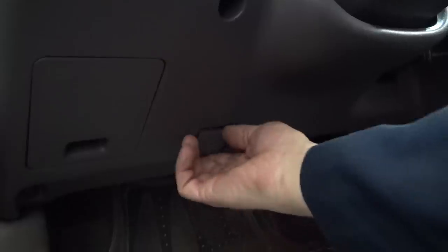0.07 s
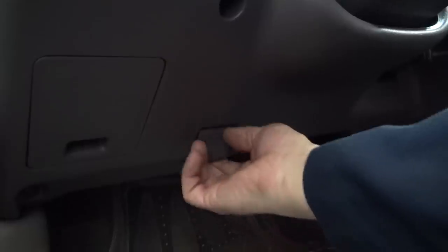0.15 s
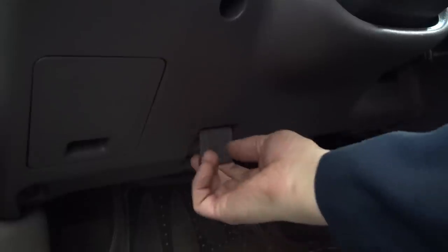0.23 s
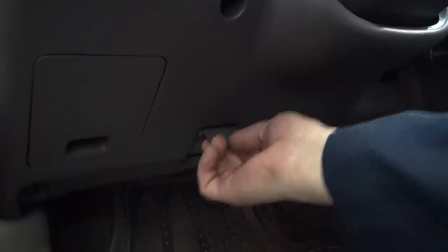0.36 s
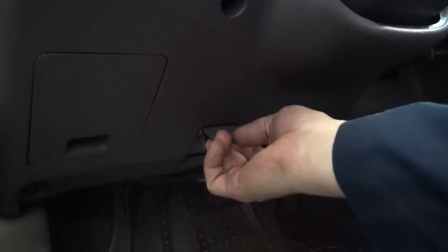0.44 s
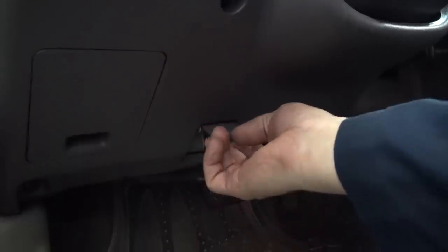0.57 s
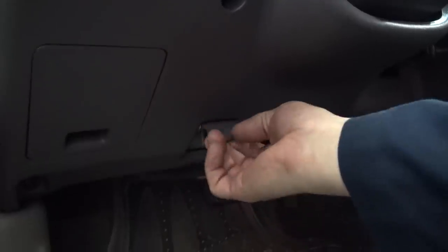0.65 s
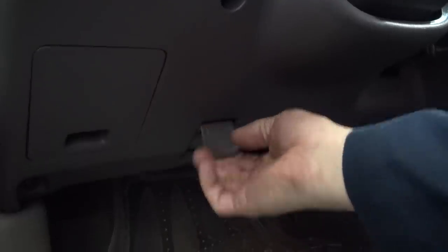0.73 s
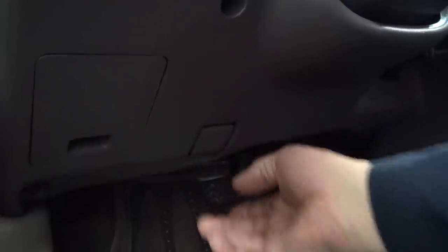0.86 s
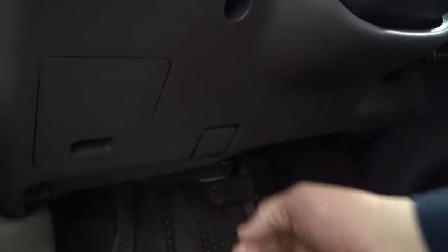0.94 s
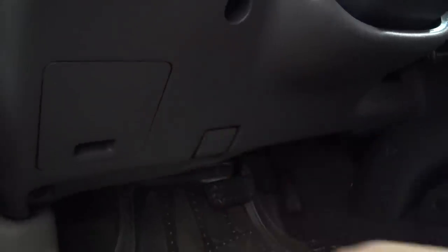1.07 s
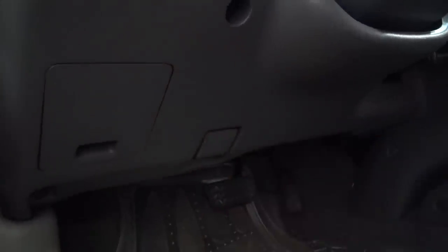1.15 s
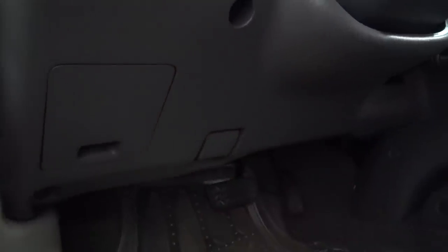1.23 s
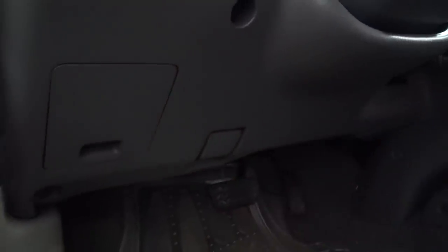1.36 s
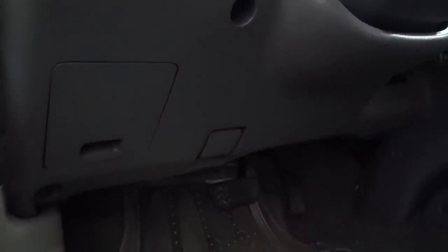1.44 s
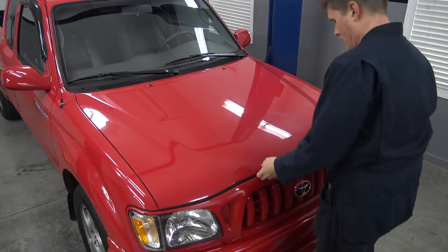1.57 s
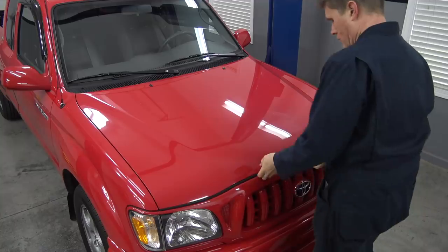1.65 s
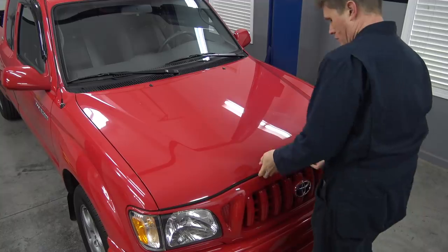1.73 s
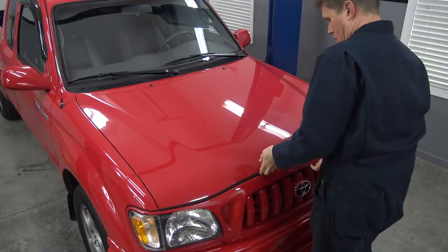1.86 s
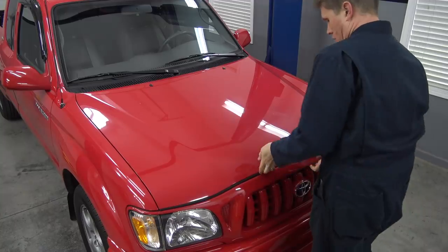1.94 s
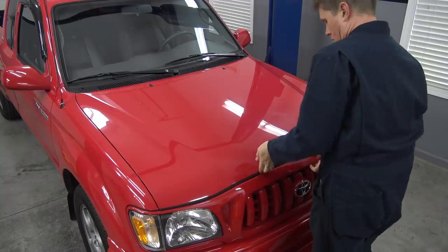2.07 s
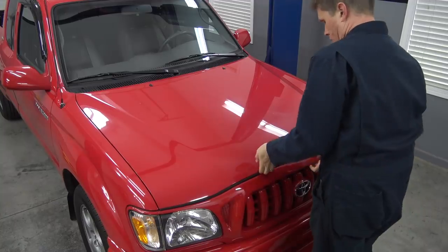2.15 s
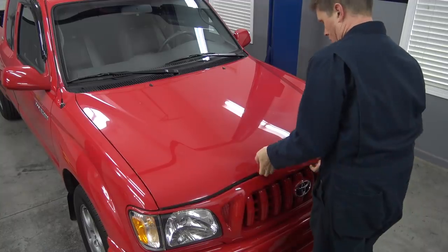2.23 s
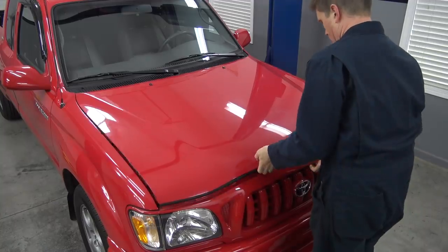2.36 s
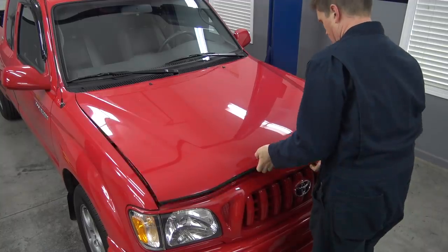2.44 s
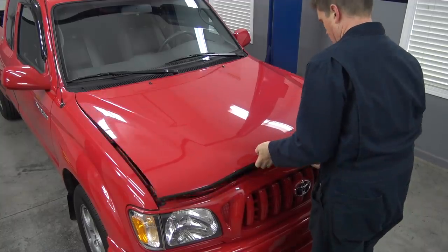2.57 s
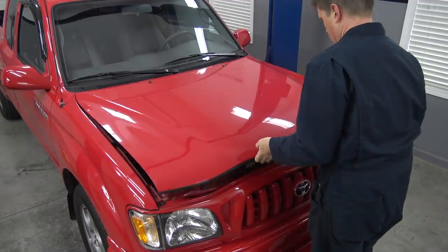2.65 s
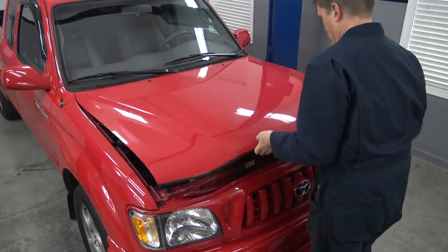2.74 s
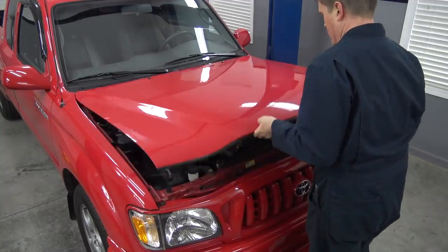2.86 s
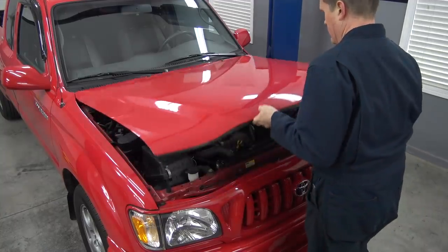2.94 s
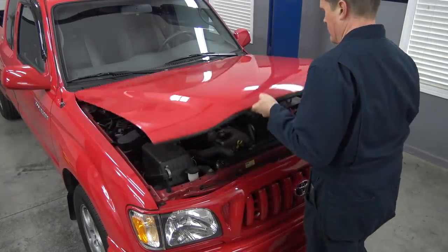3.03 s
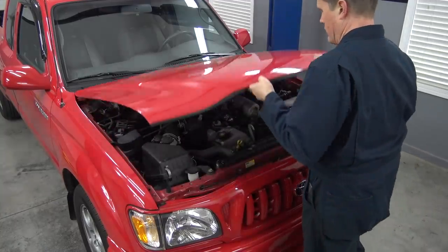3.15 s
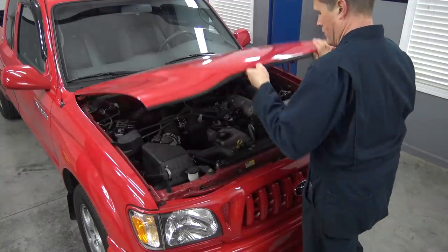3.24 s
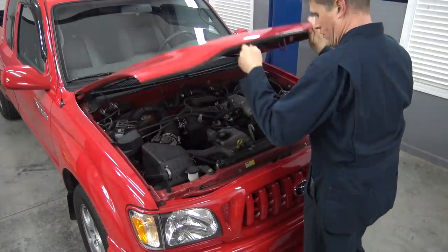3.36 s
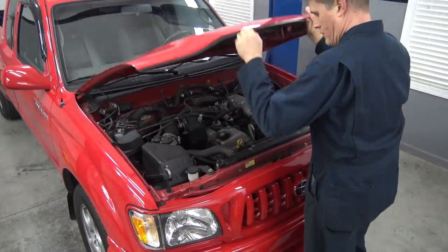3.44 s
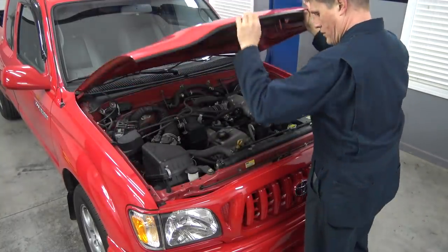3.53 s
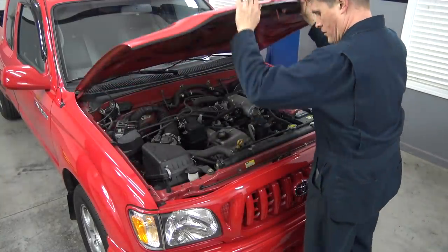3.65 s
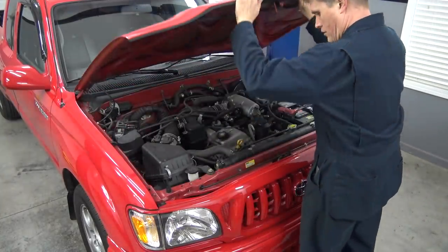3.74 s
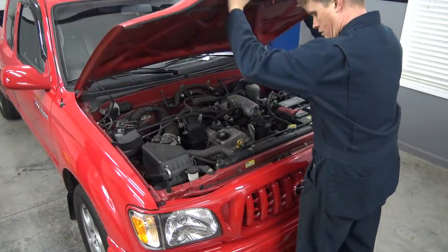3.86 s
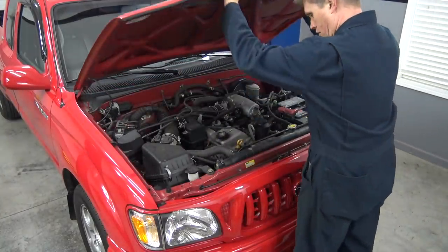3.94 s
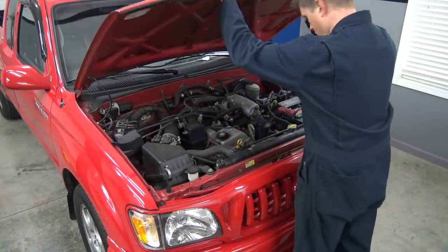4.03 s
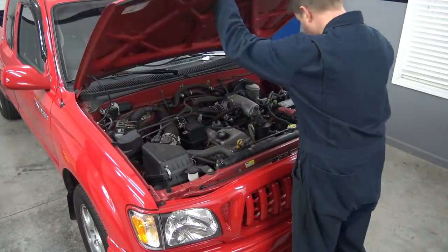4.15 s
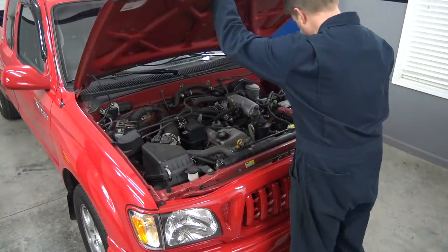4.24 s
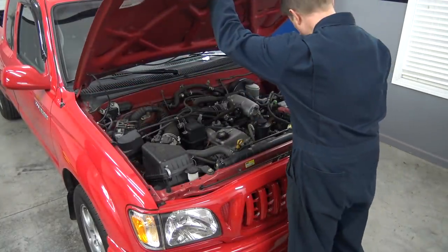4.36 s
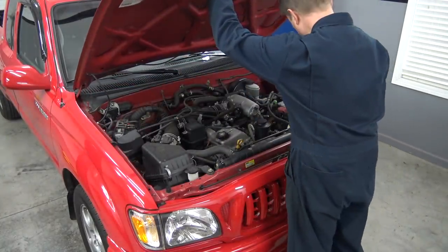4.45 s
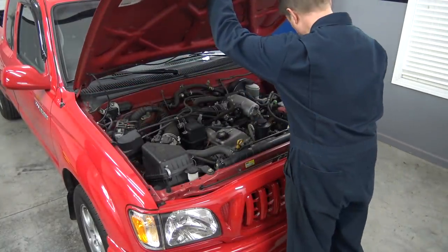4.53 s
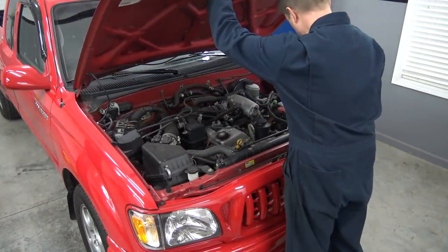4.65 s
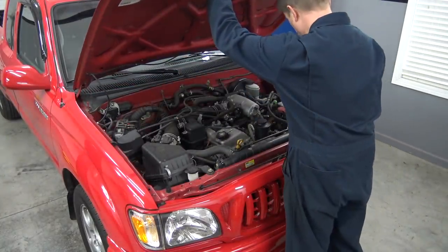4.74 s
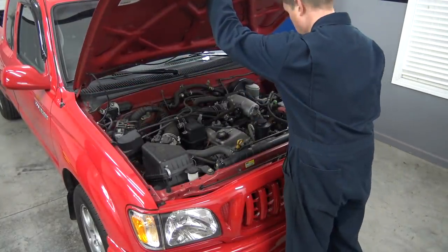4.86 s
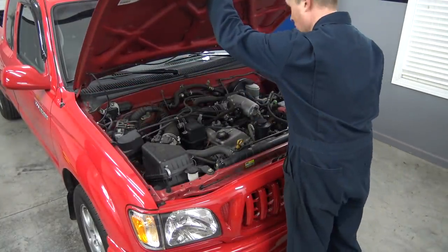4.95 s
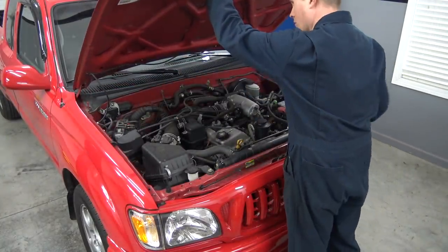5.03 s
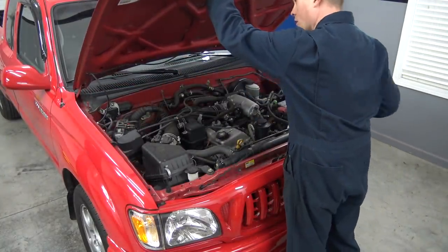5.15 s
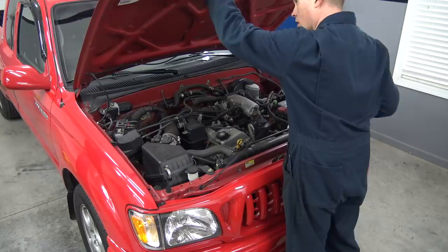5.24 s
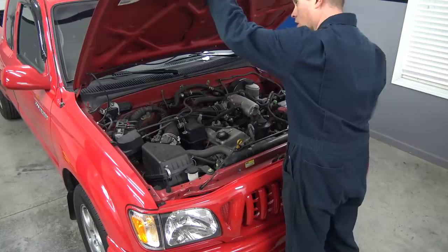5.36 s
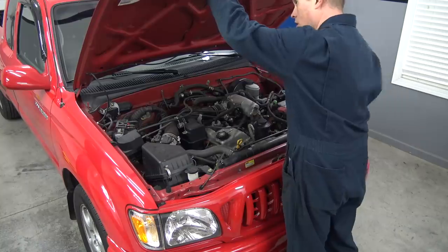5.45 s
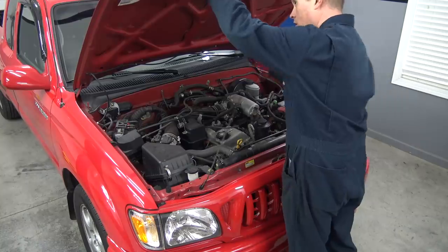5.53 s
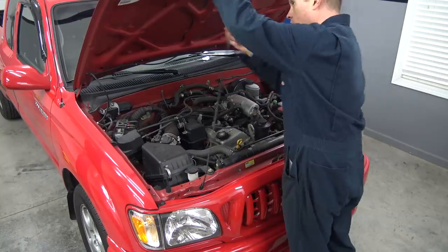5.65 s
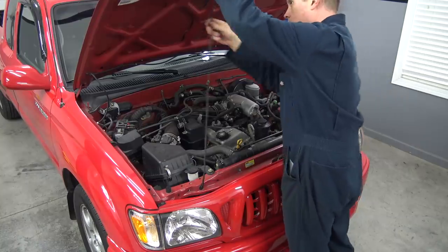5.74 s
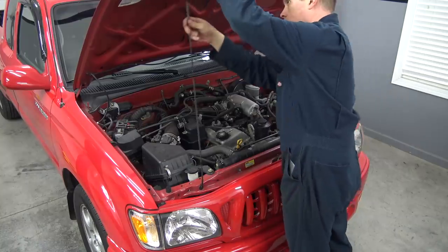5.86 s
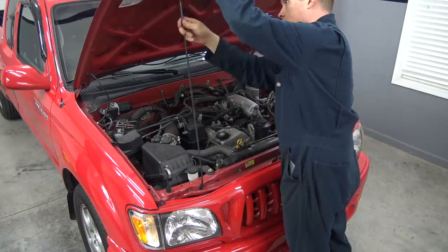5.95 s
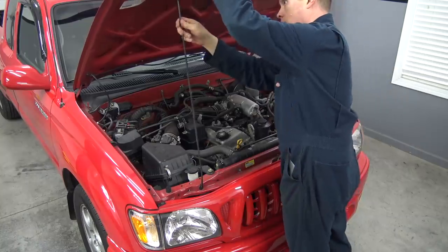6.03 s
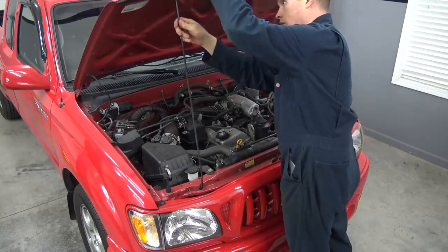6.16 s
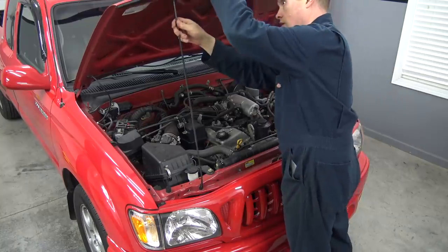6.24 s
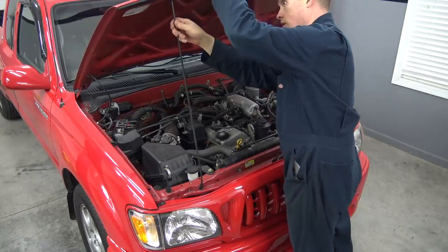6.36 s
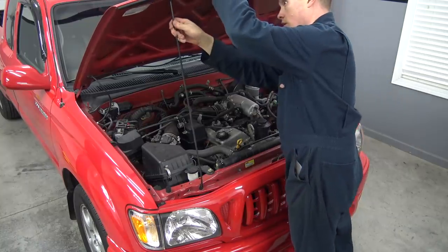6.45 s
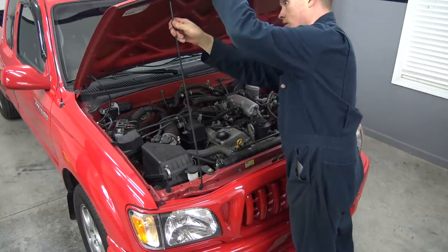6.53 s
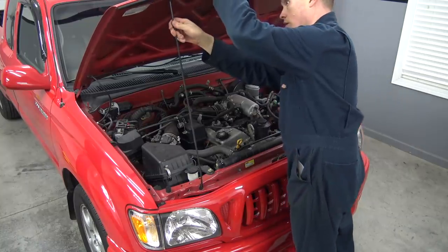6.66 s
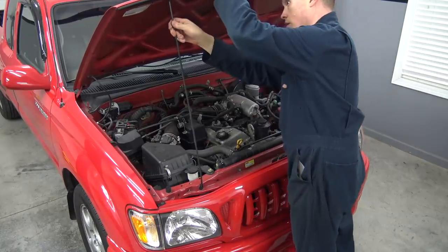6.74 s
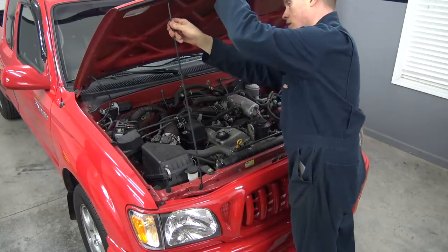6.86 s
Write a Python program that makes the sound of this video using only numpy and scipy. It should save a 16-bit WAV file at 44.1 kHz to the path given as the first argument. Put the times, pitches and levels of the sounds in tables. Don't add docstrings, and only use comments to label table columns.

```python
import sys
import numpy as np
from scipy import signal
from scipy.fft import rfft, irfft, next_fast_len
from scipy.io import wavfile

SR = 44100
rng = np.random.default_rng(int(sys.argv[2]) if len(sys.argv) > 2 else 0)


def voltage_ratio(decibels):
    exponent = np.asarray(decibels, float) / 20
    return 10 ** exponent


def pcm_store(signal):
    levels = np.round(np.clip(np.atleast_2d(signal), -1, 1) * 32767)
    wavfile.write(sys.argv[1], SR, levels.astype(np.int16).T)


N = 304016


def band(x, low_hz, high_hz):
    return signal.sosfilt(signal.butter(2, [low_hz, min(high_hz, .45 * SR)], "band", fs=SR, output="sos"), x)


def rms_one(x):
    return x / np.sqrt(np.mean(x ** 2) + 1e-20)


def at_hz(points, hz):
    table_hz, value = np.array(points).T
    return np.interp(np.log(hz), np.log(table_hz), value)


def drift(rate):
    r = np.exp(-80 * np.pi * rate / SR)
    white = rng.standard_normal(N // 40 + 2002)
    slow = rms_one(signal.lfilter([1], [1, -2 * r, r * r], white)[2000:])
    return np.interp(np.arange(N) / 40, np.arange(len(slow)), slow)


def coloured(spectrum):
    size = next_fast_len(N)
    hz = np.maximum(np.fft.rfftfreq(size, 1 / SR), 1)
    white = rfft(rng.standard_normal(N), size)
    return rms_one(irfft(white * voltage_ratio(at_hz(spectrum, hz)), size)[:N])


def causal(level_db):
    cepstrum = irfft(level_db * np.log(10) / 20)
    half = len(cepstrum) // 2
    cepstrum[1:half] *= 2
    cepstrum[half + 1:] = 0
    return irfft(np.exp(rfft(cepstrum)))[:half]


def spread(side, top_hz):
    low = signal.sosfilt(signal.butter(2, top_hz, fs=SR, output="sos"), side)
    return low * np.array([[1], [-1]])


BAND_EDGES_HZ = (60, 350, 1500, 5000, 15500)
BAND_CENTRES_HZ = (30, 150, 720, 2700, 8500, 16500)
# (contact length [s], thump over body [dB], thump per weight [dB/dB],
# body per weight [dB/dB])
TOUCH = dict(lever=(.006, -3, 1.3, .7), pop=(.013, .6, 1.1, .9), tick=(.0092, -2, 1.2, .8),
         latch=(.007, -1.5, 1.1, 1.05), palm=(.024, 1.5, 1.4, .7), hinge=(.009, -1, 1.1, .9),
         creak=(.027, -6, 2.2, .7), clip=(.0036, -3, 1.1, .9), slot=(.012, -6, 1.3, .75),
         sleeve=(.027, -4, 1.1, 1.1))


def contacts(events, touch, peaks, rise, low_stretch, end_db):
    out = np.zeros((2, N + SR))
    t = np.arange(SR // 5) / SR
    hz = np.linspace(1, SR / 2, 4097)
    body = sum(level_db / (1 + (2 * (hz - top_hz) / width_hz) ** 2) for top_hz, width_hz, level_db in peaks)
    spread_db = 10 * np.log10(SR / 2 / np.diff(BAND_EDGES_HZ))
    split = [signal.butter(1, 500, kind, fs=SR) for kind in ("high", "low")]
    length, lean_db, thump_share, body_share = TOUCH[touch]
    taus = length * np.array([[1], [low_stretch]])
    shapes = (1 - np.exp(-t / (rise * taus))) * np.exp(-t / taus)
    shapes = shapes / shapes.max(axis=1, keepdims=True)
    for s, clack_db, weight_db, tick_db in events:
        thump_db = thump_share * weight_db + lean_db
        body_db = body_share * weight_db - lean_db
        levels = np.array([thump_db, body_db, 0, tick_db]) + spread_db + clack_db - 6.5
        levels = [levels[0] + end_db[0], *levels, levels[-1] + end_db[1]]
        colour = causal(at_hz(list(zip(BAND_CENTRES_HZ, levels)), hz) + body)
        noise = rng.standard_normal(shapes.shape) * shapes
        grain = sum(signal.lfilter(*f, n) for f, n in zip(split, noise))
        burst = signal.fftconvolve(grain, colour)
        at = round(s * SR)
        out[0, at:at + len(burst)] += burst
        out[1, at:at + len(colour)] += colour * np.sqrt(np.sum(noise[0] ** 2))
    return out[:, :N]


def ringing(x, modes, ring_db):
    out = np.zeros(N)
    for hz, level_db, t60 in modes:
        r = voltage_ratio(-60 / (t60 * SR))
        w = 2 * np.pi * hz / SR
        ring = signal.lfilter([0, np.sin(w)], [1, -2 * r * np.cos(w), r * r], x + 1e-18)
        out += voltage_ratio(level_db + ring_db) * ring
    return out


def panel_hums(notes, swell_s, t60):
    out, t = np.zeros(N + SR), np.arange(SR // 3) / SR
    for s, level_db, hz in notes:
        swell = (1 - np.exp(-t / swell_s)) * voltage_ratio(level_db - 60 * t / t60)
        out[round(s * SR):][:len(t)] += swell * np.sin(2 * np.pi * hz * t + rng.uniform(0, 2 * np.pi))
    return out[:N]


def room(x, t60_table, build_s, side_db):
    t = np.arange(2 * SR) / SR
    edges = 25 * 2 ** np.arange(0, 9.5, .3)
    white, tail = rng.standard_normal((2, 2, len(t))), 0
    for k, (low_hz, high_hz) in enumerate(zip(edges, edges[1:])):
        t60 = at_hz(t60_table, np.sqrt(low_hz * high_hz))
        tail = tail + band(white[k % 2], low_hz, high_hz) * voltage_ratio(-60 * t / t60)
    tail = tail * (1 - np.exp(-t / build_s)) / np.sqrt(SR / 10)
    mid, side = signal.fftconvolve(x[None], tail, axes=1)[:, :N]
    return mid + voltage_ratio(side_db) * spread(side, 1260)


# (frequency [Hz], level [dB per Hz])
ROOM_TONE = [(15, -32), (25, -14), (53, -12), (127, 1.5), (170, -11), (285, 1.5), (335, -8), (560, -10.5),
             (624, -7.5), (2690, -16), (3620, -17), (4250, -17.5), (4610, -16.5), (6050, -20.5),
             (16000, -31)]
# (frequency [Hz], level [dB per Hz])
CLOTH = [(500, 16), (1500, 7), (3000, -12), (6000, -5), (10000, -3.5), (13500, -11), (16000, -68)]
# (middle [s], length [s], shuffle level [dB], cloth level [dB])
MOVES = [(0, .2, -45, -52), (.12, .3, -52, -45), (.42, .5, -46, -43), (.62, .3, -52, -41),
         (1.14, 1.05, -43.5, -40.5), (1.4, .4, -58, -48), (1.8, .8, -52, -70), (2.9, .9, -53, -72),
         (3.5, .6, -49, -55), (3.74, .6, -51, -52), (4.22, .45, -49, -66), (4.72, .5, -50, -44),
         (5.25, .9, -53, -75), (5.62, .45, -56, -47.5), (5.87, .6, -53, -51), (6.3, .3, -60, -60)]


def background():
    still_tone_db = -54.5
    middle, length, shuffle_db, cloth_db = np.transpose(MOVES)[:, :, None]
    t, coarse = np.arange(N) / SR, np.arange(0, N + 100, 100) / SR
    swell = np.cos(np.pi * np.clip((coarse - middle) / length, -.5, .5)) ** 2
    shuffle_power = np.sum((voltage_ratio(shuffle_db) * swell) ** 2, axis=0)
    level = np.interp(t, coarse, np.sqrt(voltage_ratio(still_tone_db) ** 2 + shuffle_power))
    rustle = np.interp(t, coarse, np.sqrt(np.sum((voltage_ratio(cloth_db) * swell) ** 2, axis=0)))
    tone = level * voltage_ratio(drift(6.8)) * coloured(ROOM_TONE)
    cloth = voltage_ratio(-2.3) * rustle * voltage_ratio(drift(15)) * coloured(CLOTH)
    return tone + cloth + spread(voltage_ratio(-17) * level * coloured(ROOM_TONE), 1200)


# (time [s], peak level [dB])
RUMBLE = [
    (0, -48),
    (.558, -37),
    (.65, -40),
    (.752, -39),
    (.97, -41),
    (1.44, -57),
]
# (frequency [Hz], level [dB per Hz])
RUMBLE_COLOUR = [(10, -12.5), (25, 11.5), (40, -13), (55, 10), (80, -33), (200, -54)]


def floor_rumble():
    rise_db_per_s, fall_db_per_s = 300, 115
    s, peak_db = np.transpose(RUMBLE)[:, :, None]
    since = np.arange(0, N, 100) / SR - s
    lumps_db = peak_db + np.minimum(rise_db_per_s * since, -fall_db_per_s * since)
    return np.repeat(voltage_ratio(lumps_db.max(axis=0)), 100)[:N] * coloured(RUMBLE_COLOUR)


# (time [s], peak level [dB], frequency [Hz])
PINGS = [(.074, -35, 850), (.252, -28, 1195), (.252, -32, 2003), (.252, -30, 1766), (.267, -30, 1281),
         (6.44, -22, 630), (.445, -19, 883), (.467, -23, 1464), (.467, -21, 1238), (.844, -22, 2519),
         (.844, -21, 1863), (.854, -15, 894), (.858, -15, 549), (.86, -20, 2638), (.862, -17, 721),
         (.862, -17, 1260), (.868, -14, 1066), (.905, -23, 1100), (1.11, -34, 1100), (1.25, -36, 1010),
         (2.359, -21, 1733), (2.359, -21, 2907), (2.361, -21, 2046), (2.365, -20, 690), (2.371, -21, 1561),
         (2.379, -20, 1863), (2.438, -21, 2638), (2.442, -20, 1378), (2.484, -21, 1884), (2.498, -25, 2659),
         (2.52, -22, 730), (2.632, -32, 6620), (2.745, -37, 6600), (2.748, -56, 13500), (2.76, -55, 12100),
         (4.546, -38, 1150), (4.622, -34, 900), (4.645, -36, 1150), (4.672, -36, 1750), (5.003, -23, 3000),
         (5.011, -20, 1195), (5.017, -21, 1604), (5.059, -23, 1206), (5.1, -22, 861), (6.368, -18, 603),
         (6.372, -24, 1669), (6.818, -14, 1292), (6.82, -23, 2229), (6.834, -14, 750), (6.84, -21, 2455),
         (6.84, -17, 1220), (6.852, -14, 732), (6.85, -15, 565), (6.862, -16, 861), (6.855, -20, 1707),
         (6.85, -20, 2067), (4.70, -38, 1800), (4.73, -39, 1700), (4.805, -38, 1250), (1.03, -31, 1090)]


def pings():
    return voltage_ratio(1.2) * panel_hums(PINGS, swell_s=.0025, t60=.07)


# (time [s], clack level [dB], weight behind the blow [dB], hard edge re clack [dB])
LEVER = [(.0745, -44, 6, -14), (.092, -35, -18, -24), (.154, -54, 12, -15), (.215, -41, -3, -14),
         (.24, -39, -4, -12), (.248, -34, -8, -16), (.2534, -27, -9, -6), (.2668, -28, -3, -6),
         (.298, -49, 20, -19), (.374, -40, -3, -11), (.391, -39, 6, -9), (.417, -28, -5, -13),
         (.759, -40, 13, -8), (.8016, -19, -4, -15), (.82, -23, -5, -18), (.8442, -12, -21, -4),
         (.8543, -14, -6, 1), (.8714, -15, 1, -6), (.909, -19, -10, -22), (1.366, -40, -15, -12),
         (1.3844, -43, 3, 1)]
# (frequency [Hz], width [Hz], level [dB])
LEVER_PLASTIC = [(172, 100, 2.6), (234, 60, 4.7), (1146, 260, 6.1), (2400, 220, 1), (4700, 800, 1.6),
                 (6100, 800, 2.4), (10000, 6400, 7.5)]


def lever_clicks():
    return contacts(LEVER, "lever", LEVER_PLASTIC, rise=.053, low_stretch=3.94, end_db=(-20, -12))


# (frequency [Hz], level [dB], t60 [s])
DASH = [(253, -4, 0.85), (593.2, 4, 0.43), (860, -4, 0.78), (1005, -13, 0.45), (1060, -4, .5),
        (1188, -13, 0.52)]


def dash_ring(lever_click):
    return ringing(lever_click, DASH, ring_db=-52)


# (time [s], peak level [dB], frequency [Hz])
KNOCKS = [(.086, -40.5, 2400), (2.445, -14, 715), (4.555, -39, 1200), (.4672, -9, 410), (.55, -21, 400),
          (.575, -23, 440), (.555, -20, 190), (.395, -26, 165), (.86, -12, 333), (1.386, -30, 248),
          (2.432, -11, 460), (2.678, -15, 455), (2.705, -20, 440), (2.48, -17, 350), (2.655, -19, 720),
          (3.527, -26, 430), (4.054, -41, 440), (4.548, -44, 305), (6.372, -8, 460), (6.3911, -12, 460),
          (6.424, -16, 445), (6.455, -19, 399), (6.5, -26, 470), (6.533, -20, 450), (6.56, -14, 468),
          (6.613, -14, 458), (6.67, -24, 470), (6.7, -24, 475), (6.762, -24, 450), (6.848, -12, 465),
          (.285, -21, 248), (.444, -4, 153), (.527, -18, 420), (.545, -15, 97), (.485, -19, 95),
          (.722, -25, 215), (.822, -25, 161), (.876, -16, 165), (2.353, -25, 280), (2.357, -18, 450),
          (2.357, -15, 125), (2.395, -18, 110), (2.465, -18, 130), (2.51, -20, 140), (2.455, -11, 385),
          (2.52, -20, 460), (2.618, -26, 183), (2.784, -25, 431), (2.838, -30, 269), (4.647, -33, 409),
          (4.685, -36, 330), (5.047, -24, 183), (6.649, -28, 205), (2.229, -41, 108)]


def panel_knocks():
    return voltage_ratio(-1.0) * panel_hums(KNOCKS, swell_s=.0059, t60=.11)


# (time [s], peak level [dB], frequency [Hz])
SNAPS = [(.249, -32, 4200), (.2535, -26, 8700), (.2538, -19, 1500), (.2572, -22, 1900), (.2668, -19, 5600),
         (.2672, -26, 4000), (.8008, -24, 4600), (.8465, -14, 2000), (5.002, -14, 3000), (5.002, -17, 4600),
         (5.002, -18, 6400), (2.44, -22, 9500), (4.535, -44, 6400), (4.66, -45, 12300)]


def catch_snaps():
    return panel_hums(SNAPS, swell_s=.0004, t60=.012)


# (time [s], peak level [dB], frequency [Hz])
BOOMS = [(.46, -26, 30), (.53, -27, 33), (.62, -29, 35), (.4445, -14, 95), (.452, -15, 160),
         (.56, -24, 190), (.66, -26, 100), (.76, -27, 165), (.82, -27, 150), (.285, -24, 260),
         (2.44, -21, 280), (2.358, -30, 6600), (2.40, -32, 6620), (6.36, -22, 310), (6.46, -24, 400),
         (5.02, -32, 4200), (5.02, -32, 2770), (5.12, -33, 3920), (2.75, -40, 6060), (2.77, -41, 5420),
         (2.82, -42, 6560), (2.84, -44, 5030), (2.93, -48, 6100), (.95, -29, 1100), (1.17, -35, 1120),
         (.29, -28, 150), (2.25, -34, 400), (.6, -28, 240)]


def shell_booms():
    return panel_hums(BOOMS, swell_s=.01, t60=.2)


# (time [s], clack level [dB], weight [dB], hard edge re clack [dB])
POP = [
    (.442, -19, 4, -3),
    (.4558, -17, 6.5, -2),
    (.4725, -21, 5, -32),
    (.5189, -25, 1, -12),
    (.5553, -31, 6, -2),
]
# (frequency [Hz], width [Hz], level [dB])
POP_THUD = [(95, 8, 10), (167, 37, -3), (450, 150, 7), (880, 150, 0), (1900, 300, 5), (4940, 6000, -5),
            (4600, 1800, 5)]


def hood_pop():
    return contacts(POP, "pop", POP_THUD, rise=.04, low_stretch=2.2, end_db=(-14, -18))


# (frequency [Hz], level [dB], t60 [s])
SHELL = [(30, -3, 1.3), (99, -4, 0.55), (160, -14, 0.078), (187, -9, 0.21), (260, -20, .4), (400, -6, 0.13),
         (460, -17, .2)]


def shell_ring(pop_click):
    return ringing(pop_click, SHELL, ring_db=-42)


# (time [s], clack level [dB], weight [dB],
# hard edge re clack [dB])
CHATTER = [(.808, -27, -10, -6), (.815, -27, -10, -7), (.826, -27, -10, -6), (.833, -26, -10, -6),
           (.839, -26, -10, -7), (.847, -16, -15, -4), (.8595, -13, -4, -4), (.865, -17, -5, -1),
           (.878, -19, -5, -2), (.887, -22, -5, -3), (6.825, -16, -5, -14)]


def lever_chatter():
    return contacts(CHATTER, "clip", LEVER_PLASTIC, rise=.1, low_stretch=2.0, end_db=(-25, -12))[0]


def small_parts():
    both = lever_chatter() + catch_snaps() + shell_booms()
    return both * voltage_ratio(np.array([[.9], [-.9]]))


# (frequency [Hz], t60 [s])
CAB_T60 = [(60, 1), (300, 0.47), (1500, 0.25), (6000, 0.39), (14000, 0.23)]


def cab_echo(x):
    return voltage_ratio(2.5) * room(x, CAB_T60, build_s=.006, side_db=-29)


# (frequency [Hz], t60 [s])
GARAGE_T60 = [(80, 0.67), (200, 1.265), (1000, 1.394), (2500, 1.26), (4000, 1.156), (6000, 1), (9000, 0.53),
              (14000, 0.47)]


def garage_echo(x, build_s, side_db):
    return room(x, GARAGE_T60, build_s, side_db)


def cab():
    lever, lever_click = lever_clicks()
    pop, pop_click = hood_pop()
    direct = lever + voltage_ratio(-12) * lever_click + pop + dash_ring(lever_click) + shell_ring(pop_click)
    inside = direct + cab_echo(lever_click + pop_click)
    outside = garage_echo(voltage_ratio(-3) * lever_click + voltage_ratio(-2) * pop_click, build_s=.0058, side_db=-33)
    both = inside + outside + floor_rumble()
    middle = both.mean(axis=0)
    leaning = voltage_ratio(-17) * band(middle, 320, 3300) + voltage_ratio(-21) * lever
    return both + leaning * np.array([[1], [-1]]) + voltage_ratio(-23) * spread(middle, 90)


# (time [s], clack level [dB], weight [dB], hard edge re clack [dB])
CATCH_TICK = [
    (1.5641, -26, -18, -.5),
]
# (frequency [Hz], width [Hz], level [dB])
TICK_BODY = [(3670, 2400, 2.7), (9000, 3000, 1.3)]


def catch_tick():
    return contacts(CATCH_TICK, "tick", TICK_BODY, rise=.046, low_stretch=1.5, end_db=(-20, -20))


# (time [s], clack level [dB], weight [dB], hard edge re clack [dB])
PALM = [
    (1.6286, -36, 8, -17),
    (1.6888, -41, 11, -14),
    (1.7504, -43, 9, -20),
    (1.9455, -43, 7, -30),
    (2.2285, -44, 8, -13),
    (2.2609, -36, 8, -18),
    (2.2854, -42, 12, -27),
    (2.3182, -38, 11, -7),
    (2.7994, -31, 3, -29),
    (3.03, -47, 4, -28),
]
# (frequency [Hz], width [Hz], level [dB])
HOOD_SKIN = [(105, 60, 3), (430, 68, 8), (746, 120, 6), (1150, 58, 5.5), (1840, 1000, 8), (3330, 5400, -10)]


def palm_pats():
    return contacts(PALM, "palm", HOOD_SKIN, rise=.19, low_stretch=1.18, end_db=(-24, -15))


# (time [s], clack level [dB], weight [dB], hard edge
# re clack [dB])
CREAK = [
    (2.1032, -43, 5, -30),
    (2.6888, -29, 2, -19),
    (4.0483, -44, 4, 2),
    (4.2398, -48, 0, -11),
    (4.5511, -36, -8, -24),
    (4.6222, -28.5, -8, -19),
    (4.6589, -26, -11, -32),
    (4.8013, -31, -11, -27),
]


def hood_creaks():
    return contacts(CREAK, "creak", HOOD_SKIN, rise=.062, low_stretch=2.7, end_db=(-30, -18))


# (time [s], clack level [dB], weight [dB], hard edge re clack [dB])
LATCH = [(2.3567, -9.5, -7, 4), (2.3635, -9, -8, -8), (2.3741, -10, -4, -1), (2.4083, -14, -6, -7),
         (2.4358, -12, 0, 4), (2.4531, -11, -5, -7), (2.4778, -12, -4, -21), (2.5297, -21, 0, -14),
         (2.5549, -14, -5, -14), (2.646, -18, -3, -10), (2.6795, -16, -3, -22), (2.753, -24, -15, -8)]
# (frequency [Hz], width [Hz], level [dB])
LATCH_STEEL = [(100, 50, 7), (430, 90, 6), (720, 27, 2), (1230, 50, 1.5), (1880, 600, 3), (2550, 400, 3),
               (3530, 50, 0.5), (5000, 160, 1.5), (5550, 100, 4), (6100, 150, 6), (6580, 130, 7),
               (7750, 150, 4), (9200, 150, 5), (13700, 200, 0)]


def latch_clunks():
    return contacts(LATCH, "latch", LATCH_STEEL, rise=.036, low_stretch=3.7, end_db=(-27, -20))


# (time [s], clack level [dB], weight [dB], hard edge re clack [dB])
SNAGS = [
    (6.076, -50, 0, 4),
    (4.665, -56, -8, 14),
    (4.79, -58, -8, 12),
    (4.54, -56, -8, 12),
    (4.505, -60, -5, 10),
    (4.524, -58, -8, 13),
    (3.005, -56, -8, 6),
    (6.817, -30, 0, -10),
]
# (frequency [Hz], width [Hz], level [dB])
CLOTH_RUB = [(3320, 1000, 1.3), (6700, 2200, 2), (10600, 1800, 2.9), (13200, 3300, 4.5)]


def snags():
    return contacts(SNAGS, "clip", CLOTH_RUB, rise=.1, low_stretch=1.5, end_db=(-30, -8))[0]


# (time [s], clack level [dB], weight [dB], hard edge re clack [dB])
SLEEVE = [(3.01, -38, 3, -18), (3.2492, -43, 0, -5), (3.8142, -36, -11, -2.5), (3.93, -32, -11, -2),
          (3.9591, -29, -15, -.5), (4.5225, -48, 1, 10), (4.651, -43.5, -2, 6.5), (4.7184, -36.5, -5, -20),
          (4.7792, -47, -8, 7), (6.0783, -64, 10, 5), (6.4914, -38, -3, -31)]


def sleeve_rubs():
    return contacts(SLEEVE, "sleeve", CLOTH_RUB, rise=.59, low_stretch=1.2, end_db=(-30, -12))[0]


# (time [s], clack level [dB], weight [dB], hard edge re clack [dB])
HINGE = [
    (3.3775, -31, 1, -6),
    (3.3891, -30, -9, -4.5),
    (3.5273, -40, 12, -6),
    (3.5513, -42, 0, -13),
    (3.6382, -50, 13, -11),
    (3.7399, -53, 12, -9),
]


def hinge_knocks():
    return contacts(HINGE, "hinge", HOOD_SKIN, rise=.062, low_stretch=2.7, end_db=(-30, -18))


# (time [s], clack level [dB], weight [dB], hard edge re clack [dB])
ROD_CLIP = [
    (5.0022, -12, -10, -1),
    (5.0069, -21, -6, -6),
    (5.0158, -17, -2.5, -8.5),
    (5.0273, -20.5, -5, -10),
    (5.9347, -58, -4, -9),
]
# (frequency [Hz], width [Hz], level [dB])
CLIP_BODY = [(180, 110, 6), (343, 240, 3.5), (646, 450, 6), (1110, 520, 8), (1620, 150, 4.5),
             (2070, 340, -4), (2920, 1200, 3.5), (3470, 270, -13), (4230, 1100, 5.5), (5030, 440, -5.5),
             (6800, 3400, 6), (8400, 500, -9)]


def rod_unclips():
    return contacts(ROD_CLIP, "clip", CLIP_BODY, rise=.14, low_stretch=1.7, end_db=(-28, -20))


# (time [s], clack level [dB], weight [dB], hard edge re clack [dB])
ROD_SLOT = [(6.3563, -23.5, 1, 5), (6.3724, -20, 2, -42), (6.3994, -31, 5, -24), (6.4503, -32, 8, -39),
            (6.4897, -38, 12, 2), (6.5364, -32, 5, -36), (6.5636, -37, 1, -8), (6.6231, -41, 15, -11),
            (6.6794, -41, 8, -32.5), (6.7684, -57, 3, -11), (6.806, -51, 7, 2), (6.8224, -18, -3, -17),
            (6.8372, -10, -1, -7.5), (6.8591, -9, -9, -6.5), (6.8802, -15, 3, -10)]
# (frequency [Hz], width [Hz], level [dB])
ROD_ON_HOOD = [(136, 76, 5.3), (311, 50, 5.2), (460, 83, 4), (610, 42, 4.6), (840, 80, 1.8),
               (1236, 46, 3.3), (1450, 310, 2.7), (2020, 430, 2.6), (7240, 500, 5.3)]


def rod_knocks():
    return contacts(ROD_SLOT, "slot", ROD_ON_HOOD, rise=.11, low_stretch=4.0, end_db=(-31, -20))


def garage():
    tick, tick_click = catch_tick()
    palm, palm_click = palm_pats()
    hinge, hinge_click = hood_creaks() + hinge_knocks()
    latch, latch_click = latch_clunks()
    sleeve = sleeve_rubs()
    clip, clip_click = rod_unclips()
    slot, slot_click = rod_knocks()
    snaps = voltage_ratio(-18) * latch_click + voltage_ratio(-16) * clip_click + voltage_ratio(-14.5) * slot_click + voltage_ratio(-10) * hinge_click
    direct = voltage_ratio(-7.5) * tick + voltage_ratio(-4.8) * latch + voltage_ratio(-4.9) * palm + voltage_ratio(-1.2) * hinge
    direct = direct + voltage_ratio(-2) * clip + voltage_ratio(-3.3) * slot + voltage_ratio(-4.56) * sleeve
    send = voltage_ratio(7) * tick_click + voltage_ratio(1.5) * latch_click + voltage_ratio(-2) * palm_click + voltage_ratio(1) * hinge_click
    send = send + voltage_ratio(4.5) * clip_click + voltage_ratio(-1) * slot_click + voltage_ratio(-2) * sleeve
    leaning = voltage_ratio(-19) * (snaps + voltage_ratio(-5) * direct) * np.array([[1], [-1]])
    return direct + snaps + leaning + garage_echo(send, build_s=.002, side_db=-21)


def scene():
    places = background() + cab() + garage()
    details = pings() + panel_knocks() + small_parts() + snags()
    return places + details


def top_cut(x):
    return signal.sosfilt(signal.butter(12, 16300, fs=SR, output="sos"), x)


def record(dry):
    rounded = 1.15 * np.tanh(dry / 1.06)
    dulled = signal.sosfilt(signal.cheby2(10, 40, 16080, fs=SR, output="sos"), rounded)
    return top_cut(dulled)


dry = scene()
out = record(dry)
pcm_store(out)
```